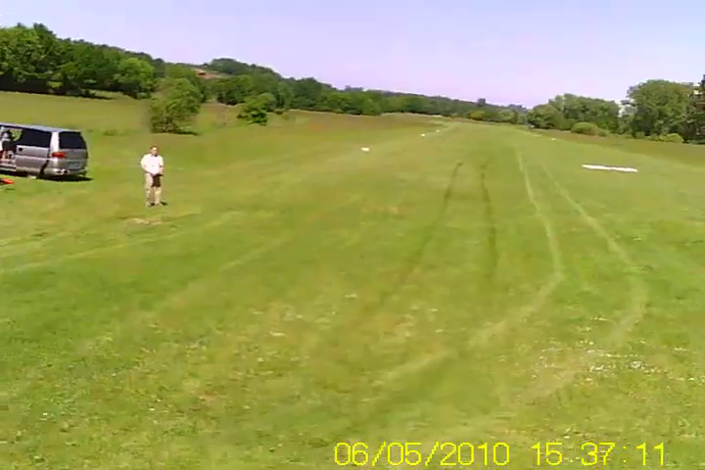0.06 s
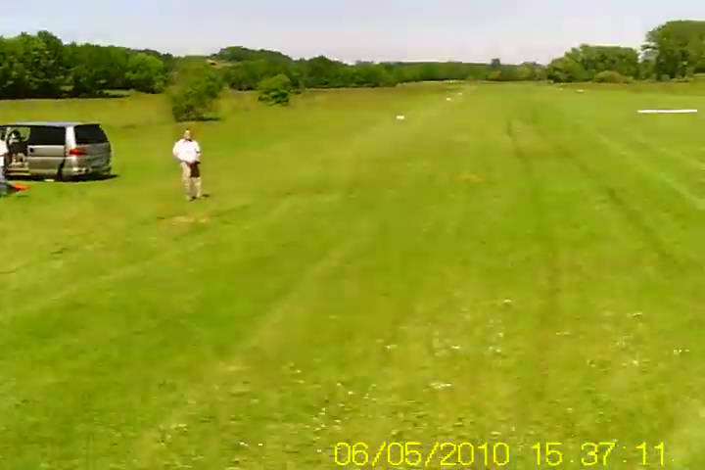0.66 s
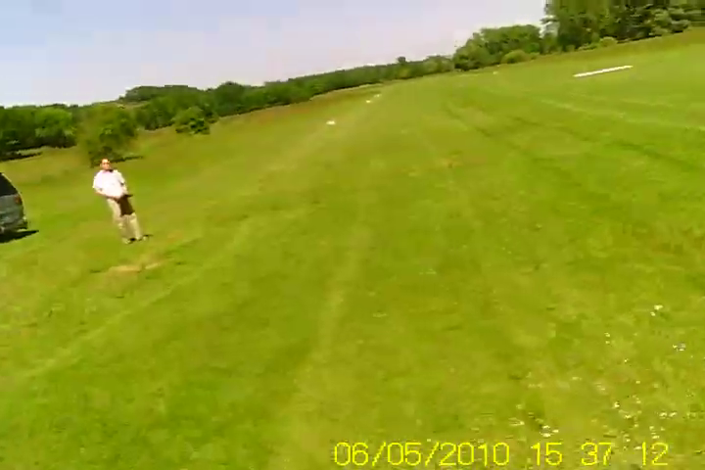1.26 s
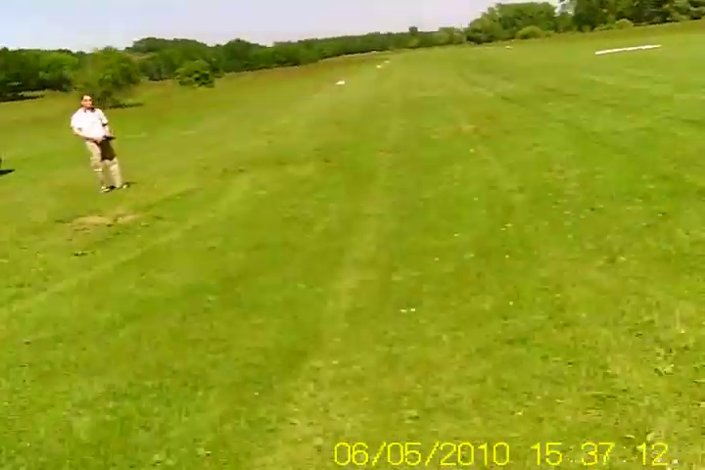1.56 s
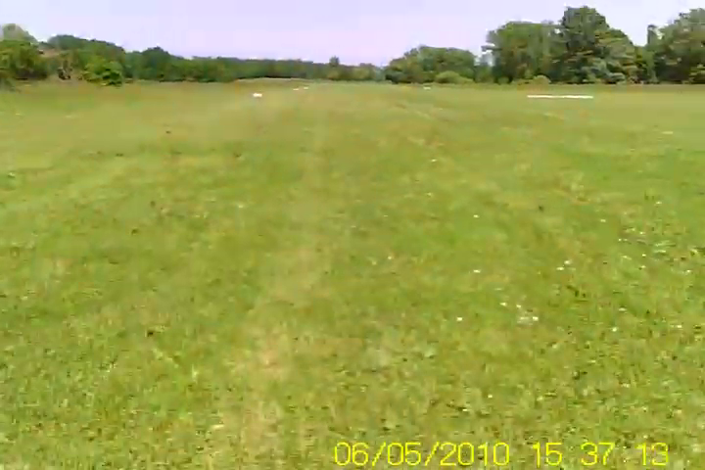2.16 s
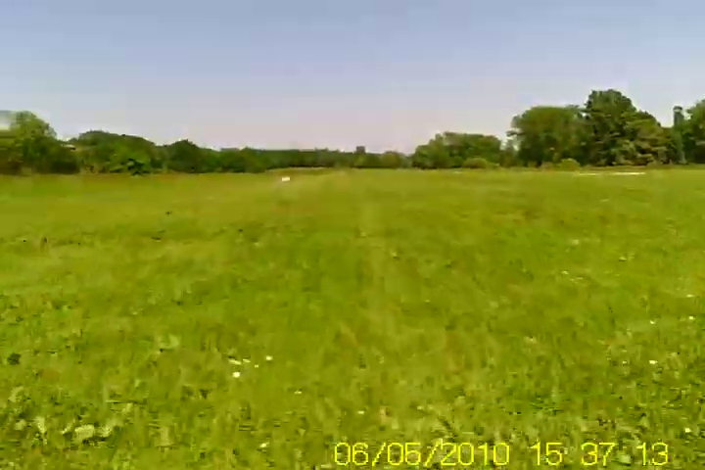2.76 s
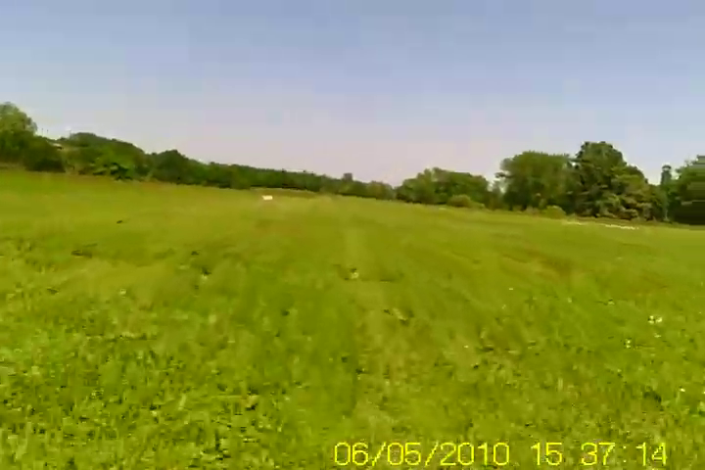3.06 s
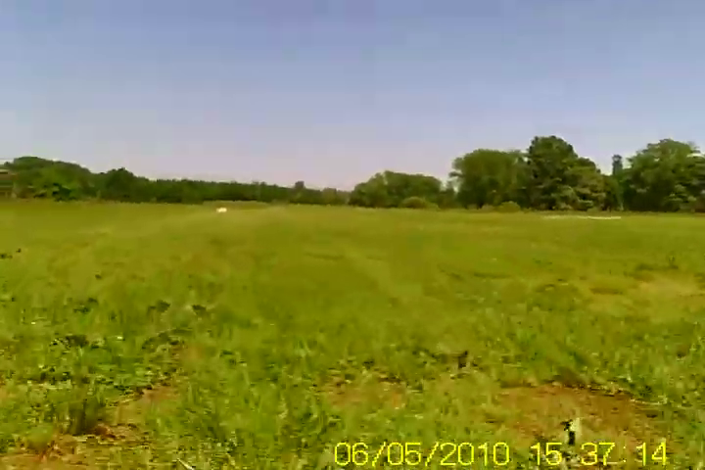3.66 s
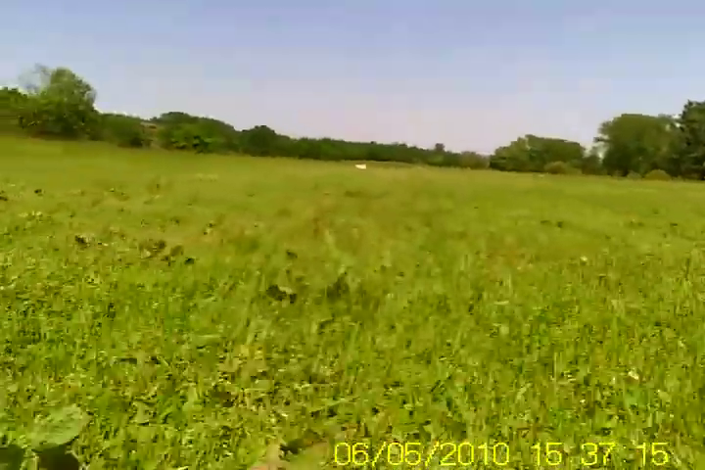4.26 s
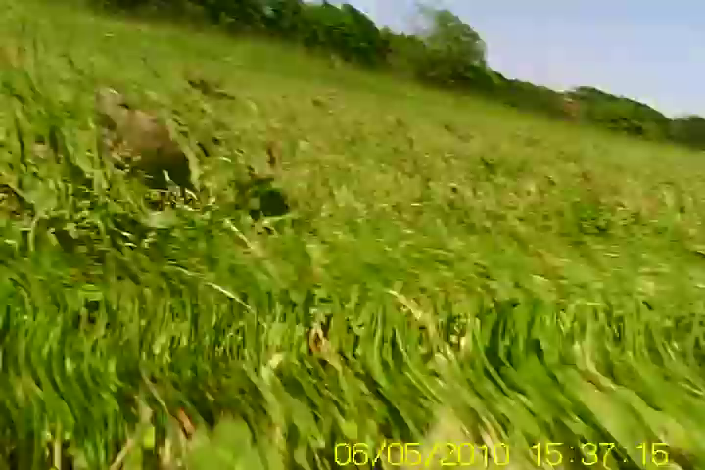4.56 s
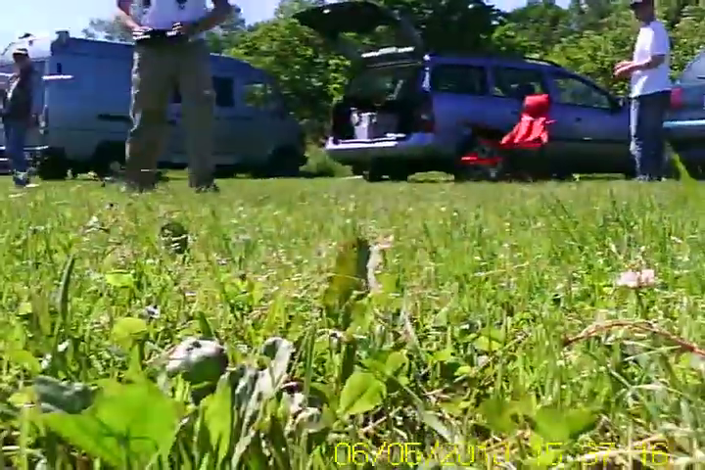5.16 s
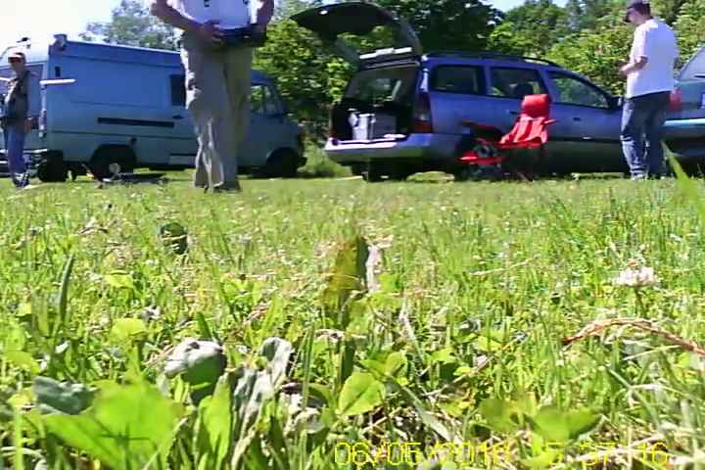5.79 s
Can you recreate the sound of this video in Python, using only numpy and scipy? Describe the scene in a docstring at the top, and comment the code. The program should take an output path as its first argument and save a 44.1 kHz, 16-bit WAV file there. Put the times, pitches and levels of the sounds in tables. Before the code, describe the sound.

From the start, wind buffets a microphone on a small model glider, a low, uneven rumble with fluttering gusts, dull pops and a hiss of air. A thin, wavering whistle comes and goes, sinking slightly in pitch over the first four seconds. Beneath the wind, small servos chatter in a fast, fine rattle, with short whirrs as they move. At about 4.3 seconds grass begins to brush the belly. Around 4.5 seconds the glider touches down with a loud rustling scrape, snapping blades and a cluster of hollow knocks and thuds, and the wind falls away. A softer slide with a few lighter knocks follows, stopping at about 5 seconds. The servos whirr again until roughly 5.3 seconds. After that there is only quiet meadow air with a faint electrical throb and a very thin whine.

```python
"""Wind buffets the microphone of a tiny camera on a small model glider as it comes in to land in a meadow.
Eddies thump the microphone port, air hisses over the airframe and an edge whistles in the stream.
The servos chatter fifty times a second and whirr as they move. The belly slides through grass,
stalks knock on the hollow hull, and the glider stops. The servos run a moment longer,
leaving still air and the camera's own faint throb and whine."""
import sys
import numpy as np
from scipy import signal
from scipy.fft import rfft, irfft
from scipy.io import wavfile

SR = 44100
rng = np.random.default_rng(int(sys.argv[2]) if len(sys.argv) > 2 else 0)


def waveform_to_disk(signal):
    """Save audio, clipped to [-1, 1], as 16-bit WAV at the path in sys.argv[1]."""
    frames = np.transpose(np.atleast_2d(signal))
    scaled = np.clip(frames, -1, 1) * 32767
    samples = np.round(scaled).astype(np.int16)
    wavfile.write(sys.argv[1], SR, samples)


N = 261513
TIME = np.arange(N) / SR
GRASS_S, DOWN_S, STOP_S = 4.3, 4.52, 4.993  # first grass tips, belly down, standstill

# Rattling gear teeth. Each row: frequency in Hz, relative level in dB.
GEAR_SPECTRUM = [(900, -37.5), (2000, 4.5), (3300, -2), (4300, 4), (4800, -3.5), (5700, 3), (6400, -0.5),
                 (7100, -5.5), (8150, -3), (8520, 6), (9000, -8), (10300, -11.5), (11200, -27),
                 (12000, -29)]
# Snapping grass blades. Each row: frequency in Hz, relative level in dB.
CRACKLE_SPECTRUM = [(3000, -18), (5000, -2.5), (6100, 6), (7200, -1.5), (8600, 0.5), (9500, -5.5),
                    (10300, -6), (11200, -25.5), (12000, -36)]
# Resonances of the hollow fuselage. Each row: frequency in Hz, width in Hz, relative level in dB.
HULL_MODES = [(1250, 22, -4), (1362, 40, -3), (1604, 18, 4), (1727, 16, -1), (1774, 20, -3), (1884, 20, -1),
              (2097, 20, -5), (2160, 30, -7), (2369, 22, -6), (2582, 24, -6), (3095, 24, -7),
              (3930, 60, -7), (6200, 200, -13)]


def undb(db):
    """Decibels to gain."""
    return 10 ** (np.asarray(db) / 20)


def unit(x):
    """Scale to rms 1."""
    return x / np.sqrt(np.mean(x ** 2))


def noise():
    """White noise."""
    return rng.standard_normal(N)


def wander(hz):
    """Smooth random motion of rms 1, low-passed at hz."""
    return unit(signal.sosfilt(signal.butter(2, hz, fs=SR, output="sos"), noise()))


def colour(x, points):
    """Minimum-phase filter through (Hz, dB) points, falling 20 dB an octave beyond both ends."""
    hz, db = np.transpose(points)
    size = 2 ** 19
    octave = np.log2(np.maximum(np.fft.rfftfreq(size, 1 / SR), 1))
    outside = np.abs(octave - np.clip(octave, np.log2(hz[0]), np.log2(hz[-1])))
    cepstrum = irfft(np.log(undb(np.interp(octave, np.log2(hz), db) - 20 * outside)))
    cepstrum[1:size // 2] *= 2
    cepstrum[size // 2 + 1:] = 0
    return irfft(rfft(x, size) * np.exp(rfft(cepstrum)))[:N]


def ring(x, modes):
    """Parallel resonances (Hz, width Hz, dB)."""
    return sum(undb(db) * signal.lfilter(*signal.iirpeak(hz, hz / width, fs=SR), x)
               for hz, width, db in modes)


def grains(rate, spread_db):
    """Random clicks of uneven size, rate a second."""
    return (rng.random(N) < rate / SR) * noise() * undb(spread_db * np.clip(noise(), -2, 2))


def strike(times, peaks_db, response):
    """Play a response, with the given peak level, at each time."""
    hits = np.zeros(N)
    hits[(np.asarray(times) * SR).astype(int)] = undb(peaks_db)
    return signal.fftconvolve(hits, response / np.abs(response).max())[:N]


def fade(start, length):
    """1 before start, 0 once length has passed."""
    return np.clip(1 - (TIME - start) / length, 0, 1)


def swell(centre, rise, fall):
    """A smooth hump of height 1."""
    return np.exp(-((TIME - centre) / np.where(TIME < centre, rise, fall)) ** 2)


def ground_speed():
    """Share of the landing speed: friction brakes the glider evenly from belly down to standstill."""
    return fade(DOWN_S, STOP_S - DOWN_S)


def grass_depth():
    """How deep the nose is in the grass, 0 to 1."""
    return 1 - fade(GRASS_S, DOWN_S - GRASS_S)


def wind():
    """Turbulence on the port: large eddies roll, small ones flutter in bursts that also shake the hiss."""
    # Large eddies, small eddies and air hiss. Each row: frequency in Hz, relative level in dB.
    buffet_spectrum = [(12, -7), (25, 0), (55, 1.5), (100, -1.5), (160, -7.5), (270, -14), (400, -27),
                       (700, -42)]
    flutter_spectrum = [(130, -13), (250, 1.5), (380, 3), (630, -4.5), (1000, -13), (2000, -24),
                        (4000, -36.5)]
    hiss_spectrum = [(300, -10), (700, -4), (1200, -2), (1700, -0.5), (2200, -1), (2900, -6), (3300, -11),
                     (3650, -6), (3850, -10.5), (4200, -10.5), (4800, -18), (7000, -28), (11000, -44)]
    # Airflow as the glider rises and dips; each layer follows a share of it.
    # Each row: time in seconds, strength in dB about the usual flow.
    airflow = [(0, 6.5), (.2, -2.5), (.38, -3), (.6, -3.5), (.92, 5.5), (1.05, -0.5), (1.22, 5), (1.45, -6),
               (2.05, 6), (2.42, 2.5), (2.7, -1.5), (3.0, -2), (3.22, -0.5), (3.45, -2.5), (3.9, 1),
               (4.2, -6.5)]
    # Gusts that swell the buffeting. Each row: centre in seconds, half width in seconds, boost in dB.
    gusts = [(-0.007, 0.022, 8.5), (1.5, 0.19, 2.5), (2.037, 0.059, 1.5), (2.475, 0.085, 4.5),
             (3.22, .05, 5.5), (4.12, 0.12, 2)]
    flow_db = np.interp(TIME, *np.transpose(airflow))
    gust_db = sum(db * swell(centre, half, half) for centre, half, db in gusts)
    shelter_db = -11 * (1 - fade(DOWN_S, .05))  # deep in the grass the port is out of the wind
    # The speed of the stream limits how hard an eddy can hit.
    burst = 2.53 * np.tanh(unit(wander(130) + 0.15 * wander(30)) / 2.13)
    buffet = unit(colour(noise() * undb(3.53 * burst), buffet_spectrum))
    buffet = unit(np.tanh(buffet / 3.9)) * undb(-20 + 0.35 * flow_db + gust_db + shelter_db)
    flutter = unit(colour(noise() * undb(3.2 * burst + 1.48 * wander(6.9)), flutter_spectrum))
    flutter *= undb(-34 + 0.72 * flow_db)
    hiss = unit(colour(noise() * undb(3.3 * burst + 2.8 * wander(303.7)), hiss_spectrum))
    hiss *= undb(-42 + 0.82 * flow_db)
    return buffet * ground_speed() + (flutter + hiss) * (1 - grass_depth() ** 2)


def edge_tones():
    """An edge sings in the stream, torn by the turbulence into a narrow band."""
    # Whistles, lower as the glider loses speed. Each row: centre in seconds, half width in seconds,
    # pitch in Hz, level in dB, wobble as a share of the pitch.
    whistles = [(0.09, 0.094, 2145, -33.5, 0.019), (.9, 0.21, 2115, -41.5, .11),
                (1.194, 0.1, 2200, -48, 0.14), (2.25, 0.42, 1978, -45.5, .14),
                (3.303, 0.19, 1807, -45.5, .17), (3.774, 0.28, 1756, -46, 0.18)]
    waver = wander(149.6)
    flicker = wander(97) + 1j * wander(130)  # shakes both level and phase
    tones = 0
    for centre, half, hz, db, wobble in whistles:
        tone = np.exp(2j * np.pi * np.cumsum(hz * (1 + wobble * waver)) / SR)
        tones += unit(np.real(flicker * tone)) * undb(db) * swell(centre, half, half)
    return tones


def servo_load():
    """Gain of the chatter: a light idle with bouts under load, until the servos fall silent."""
    # Bouts of hard work. Each row: start in seconds, length in seconds, level in dB.
    bouts = [(0, .32, -51), (0.516, .13, -52), (0.727, 0.7, -49), (1.67, 0.68, -50.5), (2.451, 0.33, -47.5),
             (2.88, 0.14, -49.5), (3.106, .14, -51.5), (3.404, 0.65, -49.5), (3.983, 0.36, -46),
             (4.5, .7, -50.5)]
    idle_db, off_s, edge_s = -58.5, 5.22, 0.022
    load = undb(idle_db) * fade(off_s, edge_s)
    for start, length, db in bouts:
        gate = fade(start + length, edge_s) - fade(start - edge_s, edge_s)
        load = np.maximum(load, undb(db) * gate)
    return load


def servo_chatter():
    """Each control frame kicks three servos in turn for a few ms and their gear teeth rattle."""
    frame_hz = 50
    kicks = 0
    for lag_s, kick_db in [(-.0022, 0.5), (.0038, 3.5), (.0085, -15.5)]:
        frame, phase = np.divmod((TIME - lag_s) * frame_hz + 1.488, 1)
        size, jitter = rng.standard_normal((int(frame[-1]) + 1, 2))[frame.astype(int)].T
        age_s = (phase - .5) / frame_hz - 0.0013 * jitter
        # The motor jerks into motion, runs a moment and is braked.
        width_s = np.where(age_s < 0, .0011, .0026)
        strength = undb(kick_db + 6 * np.minimum(size, .7))
        kicks += strength * np.exp(-np.abs(age_s / width_s) ** 3)
    rattle = 0.32 * unit(grains(2700, spread_db=1.5)) + noise()
    hunting = undb(2 * wander(10))  # the load wavers as the control surfaces hunt
    return unit(colour((kicks + 0.031) * rattle, GEAR_SPECTRUM)) * servo_load() * hunting


def eddy_pops():
    """Single eddies hit the port, each with a dull pop."""
    # Eddy hits. Each row: time in seconds, peak level in dB.
    eddies = [(0.19, -17), (0.878, -14.5), (1.265, -17.5), (1.8, -17), (2.31, -35), (2.596, -20.5),
              (3.001, -28.5), (3.471, -22), (3.678, -25), (3.954, -17.5)]
    pop = colour(signal.unit_impulse(N), [(100, -3), (500, 6.5), (1200, -8), (3000, -20.5), (5000, -38)])
    return strike(*np.transpose(eddies), pop)


def servo_whirr():
    """Servos travel to a new position: the gears run without pause and the motor shakes the tray."""
    # Servo moves. Each row: start in seconds, length in seconds, gear level in dB,
    # motor growl in dB relative to the gears.
    moves = [(0.239, 0.079, -40, -3.5), (0.518, 0.033, -44.5, -14), (1.15, 0.11, -43.5, -13),
             (1.381, 0.015, -39, -15), (2.426, 0.056, -42, 0.5), (2.914, 0.021, -42.5, -8),
             (3.092, 0.015, -45.5, -5), (4.131, 0.058, -40, -15), (4.214, 0.024, -41.5, -9),
             (4.285, 0.06, -46.5, -12), (5.017, 0.0042, -41.5, -3), (5.024, 0.046, -47, -4),
             (5.061, 0.075, -42.5, -3.5), (5.141, 0.018, -47.5, 0), (5.157, 0.056, -39.5, 1),
             (5.244, 0.013, -57.5, -5), (5.281, 0.005, -54, -15), (5.294, 0.0052, -61, -8),
             (5.318, 0.0047, -49.5, -19)]
    # Resonances of motor and tray. Each row: frequency in Hz, width in Hz, relative level in dB.
    tray_modes = [(1380, 130, -4), (1810, 60, -2), (2300, 70, 1), (2490, 70, 0), (3640, 90, -5),
                  (4150, 80, -1), (6320, 70, -6), (10300, 250, -15)]
    drive, growl = np.zeros(N), np.zeros(N)
    for start, length, db, growl_db in moves:
        progress = (TIME - start) / length
        # The sound eases off as the motor nears its position.
        speed = np.interp(progress, [0, .1, .5, .95, 1], [0, 1, 1, .3, 0])
        drive += speed * undb(db)
        growl += speed * undb(db + growl_db)
    teeth = (1.03 * unit(grains(2500, spread_db=4.4)) + noise()) * undb(0.23 * wander(250))
    tray = colour(ring(teeth, tray_modes), [(700, -45), (1300, 9.5), (2300, 5), (11000, -1)])
    return drive * unit(colour(teeth, GEAR_SPECTRUM)) + growl * unit(tray)


def grass_slide():
    """Blades brush and snap along the belly and ring the hollow hull."""
    # Brushing blades. Each row: frequency in Hz, relative level in dB.
    swish_spectrum = [(500, -25.5), (1000, -10.5), (1400, 6.5), (1800, 5), (2400, 2), (3200, -3.5),
                      (4000, -2.5), (4900, -24), (6000, -21.5)]
    # The belly digs in and lifts again. Each row: time of hardest contact, rise and fall in seconds,
    # swish level in dB, then rumble and crackle in dB relative to the swish.
    scrapes = [(4.375, 0.018, 0.019, -32, -2.5, -8), (4.413, 0.021, 0.045, -31.5, -3.5, -13.5),
               (4.468, 0.02, .02, -25, -3, -5), (4.498, 0.016, 0.046, -19.5, -14.5, -12.5),
               (4.695, 0.036, 0.075, -39.5, -2.5, -6.5), (4.776, 0.018, 0.043, -41, 1.5, -18),
               (4.94, .035, 0.066, -45, -14, -17)]
    blades = unit(grains(4000, spread_db=2.3)) + 0.62 * noise()
    hull = unit(ring(np.roll(blades, SR // 500), HULL_MODES))
    swish = unit(unit(colour(blades, swish_spectrum)) + 0.33 * hull)
    crackle = unit(colour(blades, CRACKLE_SPECTRUM))
    rumble = unit(colour(noise(), [(120, -3.5), (300, -5), (600, -9), (1000, -7.5)]))
    drag = undb(-38) * ground_speed() * grass_depth() ** 2
    slide = drag * (swish + undb(-5.5) * crackle + undb(-2) * rumble)
    for centre, rise, fall, db, rumble_db, crackle_db in scrapes:
        scrape = swish + undb(crackle_db) * crackle + undb(rumble_db) * rumble
        slide += undb(db) * swell(centre, rise, fall) * scrape
    contact = undb(wander(62))
    return contact * slide


def hull_knocks():
    """Stalks and bumps strike the hull: a bright snap, a hollow ring and a low thud."""
    # Impacts. Each row: time in seconds, then peak levels of snap, ring and thud in dB.
    impacts = [(4.366, -39, -24.5, -23.5), (4.376, -19, -30, -29), (4.388, -22, -33, -30),
               (4.401, -34, -24, -25.5), (4.491, -28.5, -13, -14), (4.505, -35, -8, -13.5),
               (4.516, -29, -20, -14.5), (4.552, -13.5, -18.5, -9), (4.568, -33, -29, -30),
               (4.591, -27, -42, -48), (4.716, -36, -19, -34), (4.769, -38, -29, -28),
               (4.807, -47, -33, -24)]
    times, snap_db, ring_db, thud_db = np.transpose(impacts)
    crack = noise() * np.exp(-TIME / 0.00041)
    snaps = strike(times, snap_db, colour(crack, CRACKLE_SPECTRUM))
    rings = strike(times, ring_db, ring(crack, HULL_MODES))
    thud = colour(signal.unit_impulse(N), [(40, 11.5), (200, -4), (600, -9), (1500, -27)])
    return snaps + rings - strike(times, thud_db, thud)


def hull_rocking():
    """Slow pressure swings on the port while the hull rocks to rest."""
    pressure = unit(colour(noise(), [(3, 2), (7, -2), (14, -15), (28, -49)]))
    return pressure * undb(-20.5) * ground_speed() * grass_depth()


def still_air():
    """A soft bed of meadow air and microphone hiss, uncovered once the glider rests."""
    # Air and hiss. Each row: frequency in Hz, relative level in dB.
    bed_spectrum = [(25, 0), (60, 3.5), (100, -3), (170, -10), (260, -15), (400, -19.5), (600, -23),
                    (900, -25), (1400, -25.5), (1900, -36), (2400, -33), (3200, -40), (9500, -39.5),
                    (10800, -47), (12000, -65.5)]
    return unit(colour(noise(), bed_spectrum)) * undb(-52.5 + 0.58 * wander(6))


def camera_electronics():
    """The camera gives a soft electrical thump for every picture, and a thin steady whine."""
    # Tones of the whine. Each row: frequency in Hz, peak level in dB.
    whine_tones = [(3892, -80.5), (5599, -82), (7402, -81.5), (9598, -84.5)]
    picture_hz = 24.55
    times = np.arange(.0225, TIME[-1], 1 / picture_hz)
    thump = ring(signal.unit_impulse(N), [(82.1, 60, 0.5), (157.6, 86, -2.5), (247, 110, -15)])
    thump = colour(thump, [(40, 2), (220, -0.5), (600, -20)])
    throb = strike(times, -44 + 1.5 * rng.standard_normal(len(times)), thump)
    whine = sum(undb(db) * np.sin(2 * np.pi * hz * TIME) for hz, db in whine_tones)
    return throb + whine


def scene():
    """Everything reaches the one microphone on the airframe."""
    flight = wind() + edge_tones() + servo_chatter() + eddy_pops() + servo_whirr()
    landing = grass_slide() + hull_knocks() + hull_rocking()
    return (flight + landing + still_air() + camera_electronics())[None]


def record(dry):
    """The little camera's converter sits slightly off zero and cuts the top."""
    offset, top_hz = -.016, 12000
    return signal.sosfilt(signal.ellip(10, .2, 80, top_hz, fs=SR, output="sos"), dry + offset)


dry = scene()
out = record(dry)
waveform_to_disk(out)
```